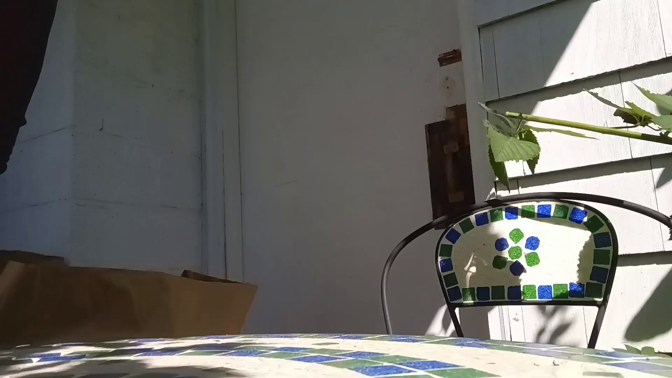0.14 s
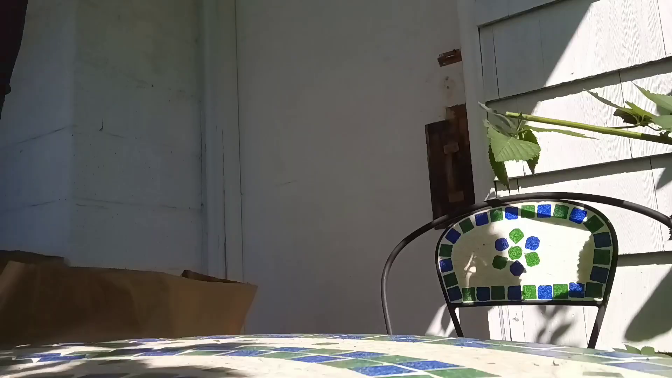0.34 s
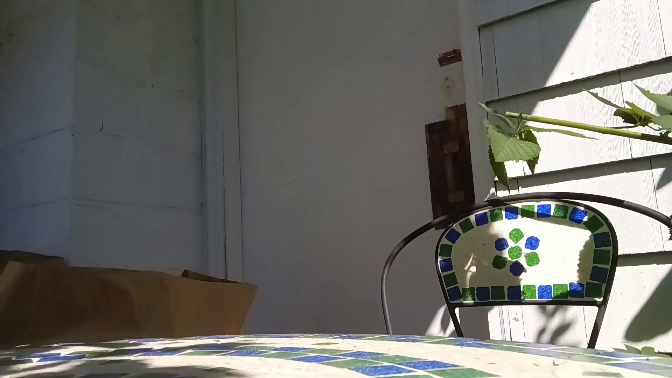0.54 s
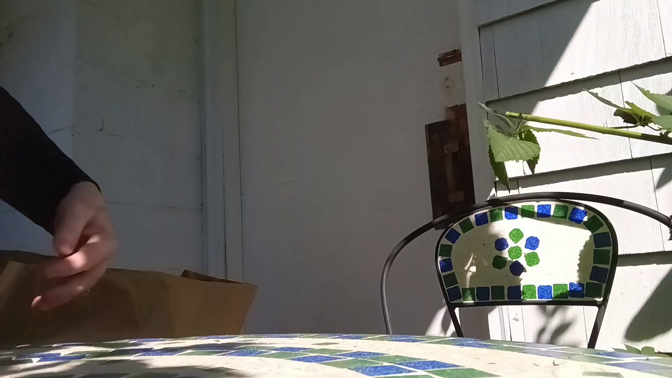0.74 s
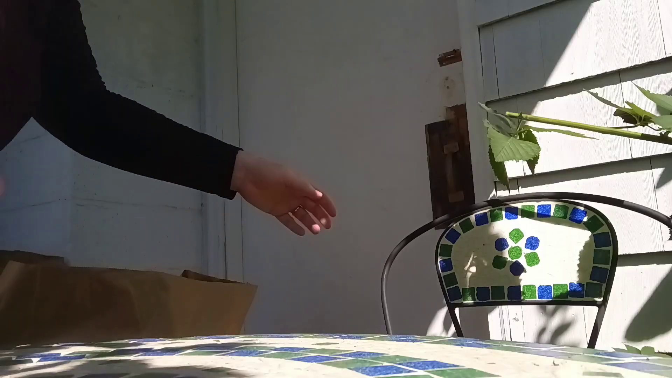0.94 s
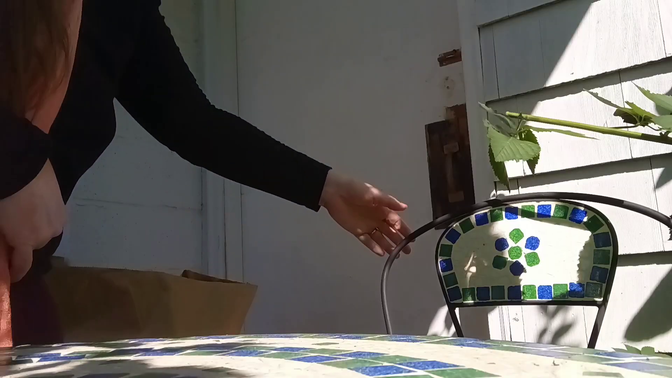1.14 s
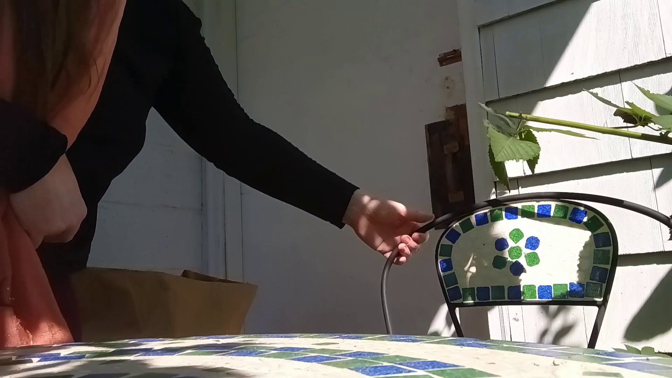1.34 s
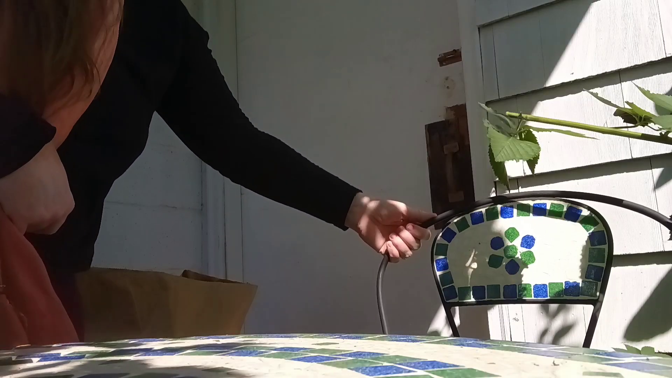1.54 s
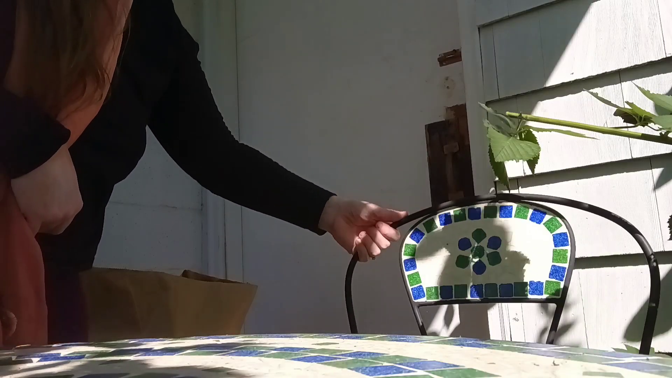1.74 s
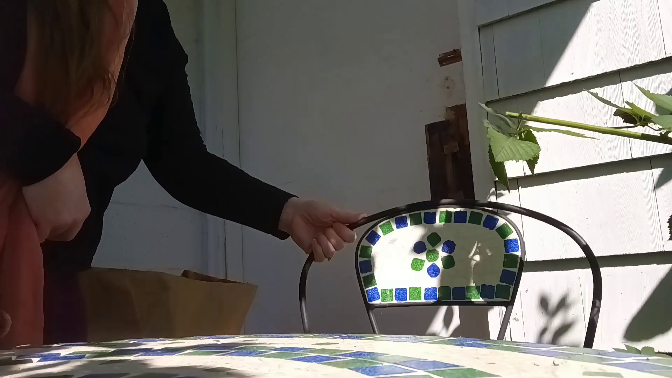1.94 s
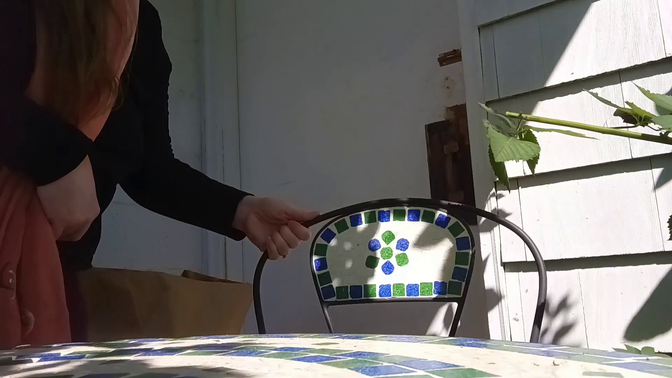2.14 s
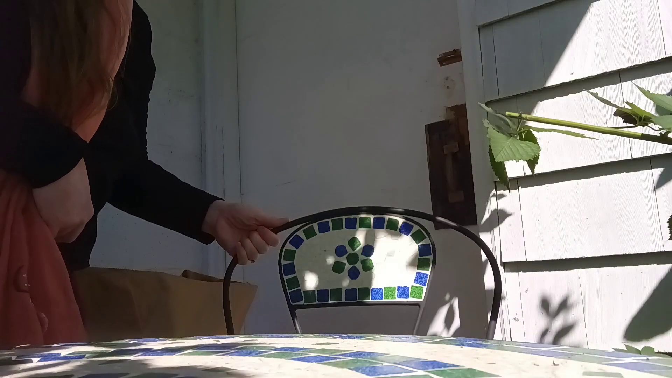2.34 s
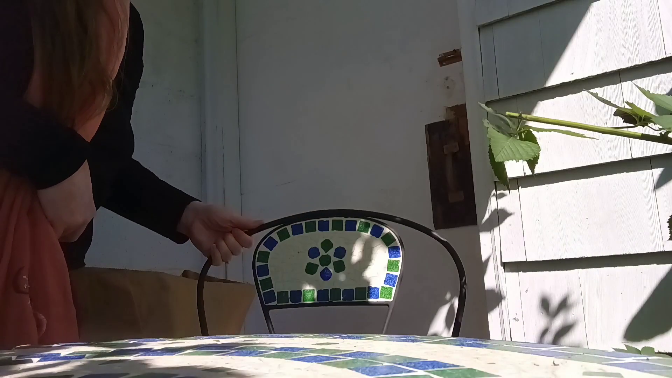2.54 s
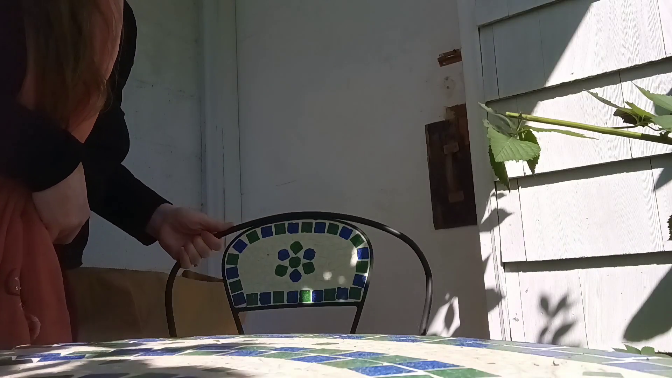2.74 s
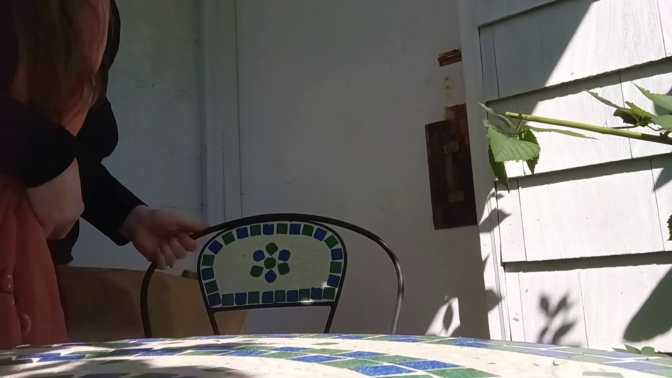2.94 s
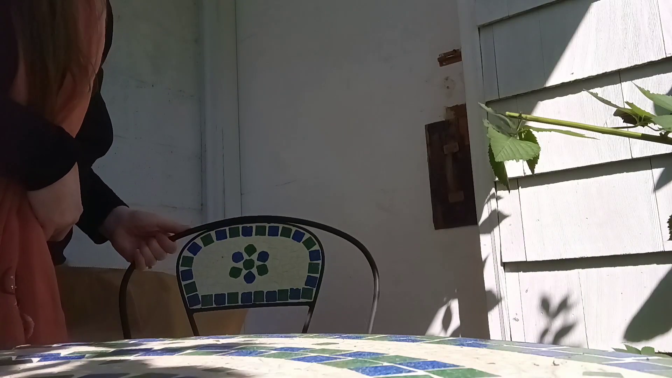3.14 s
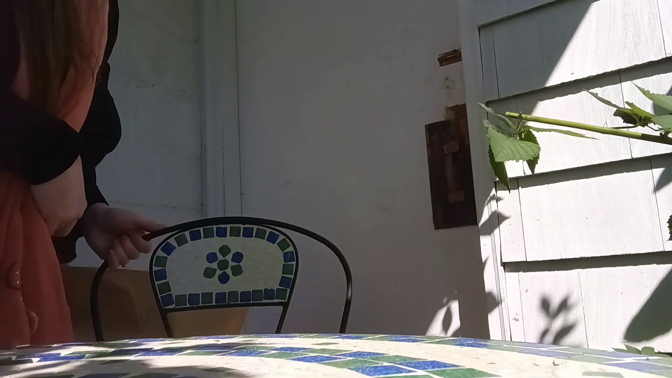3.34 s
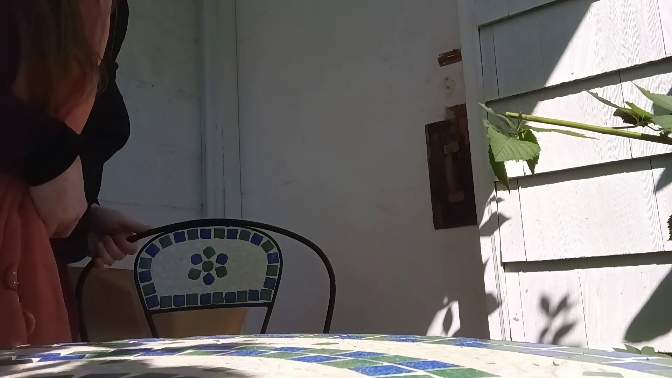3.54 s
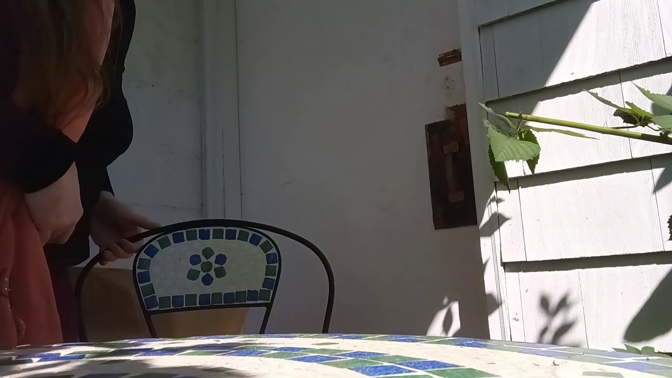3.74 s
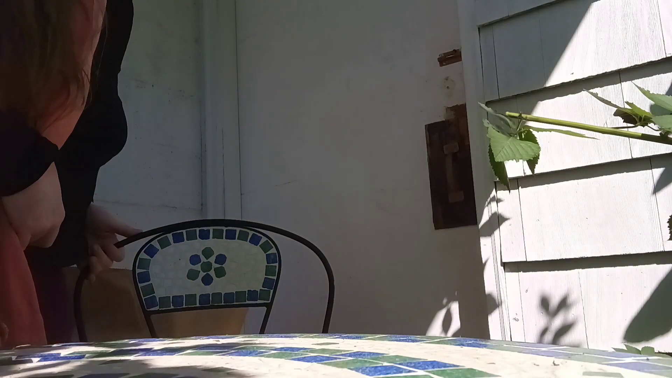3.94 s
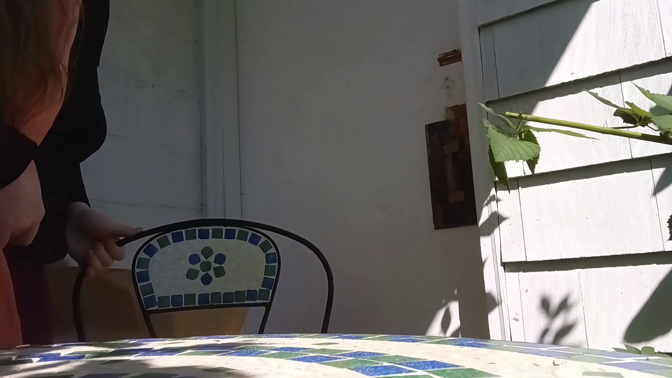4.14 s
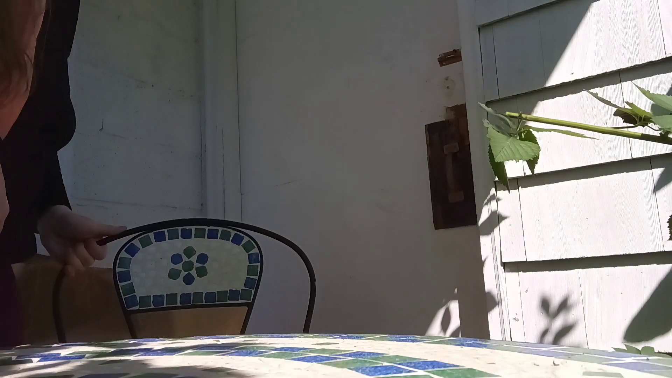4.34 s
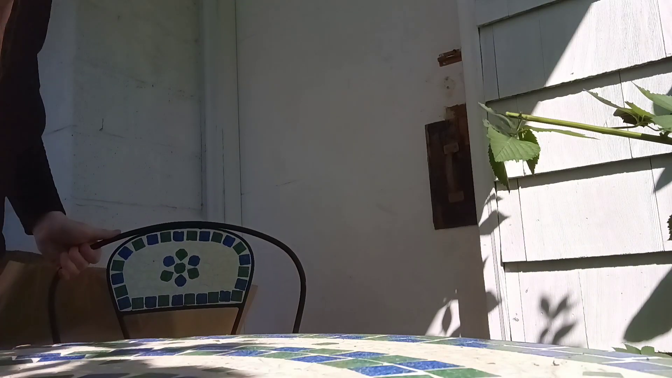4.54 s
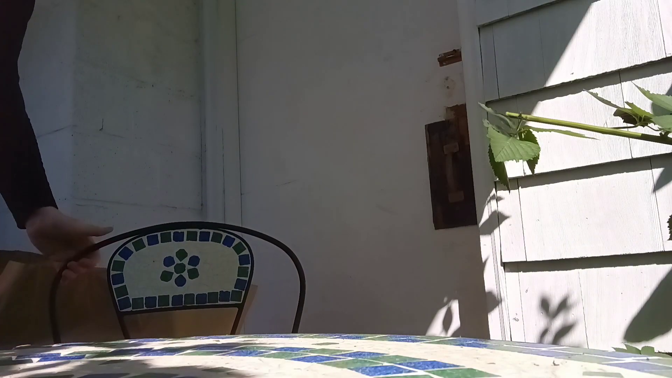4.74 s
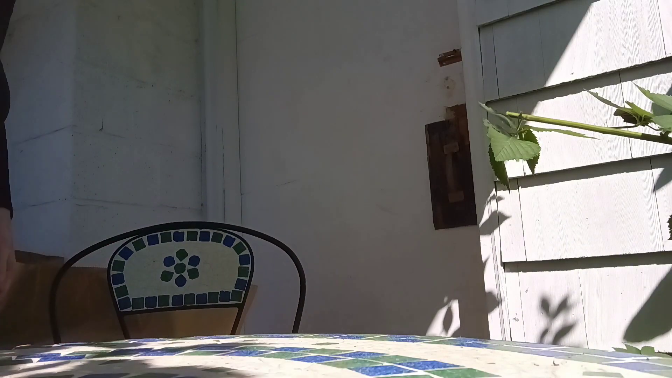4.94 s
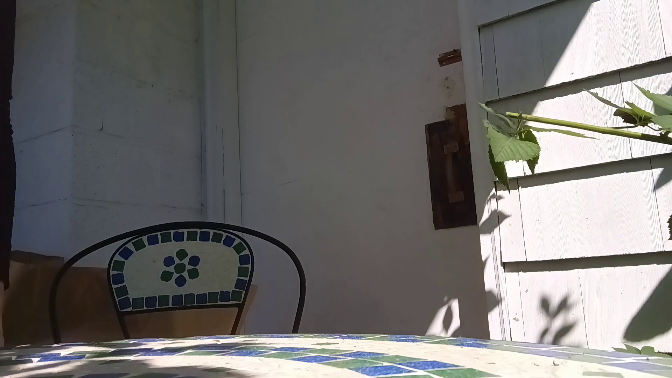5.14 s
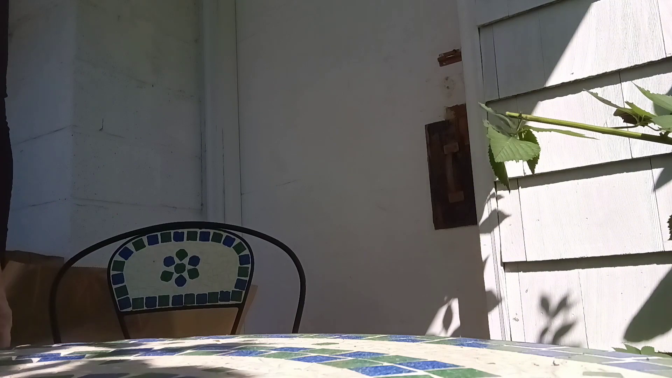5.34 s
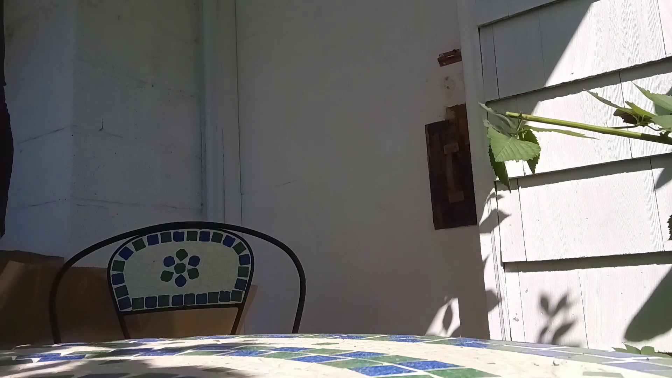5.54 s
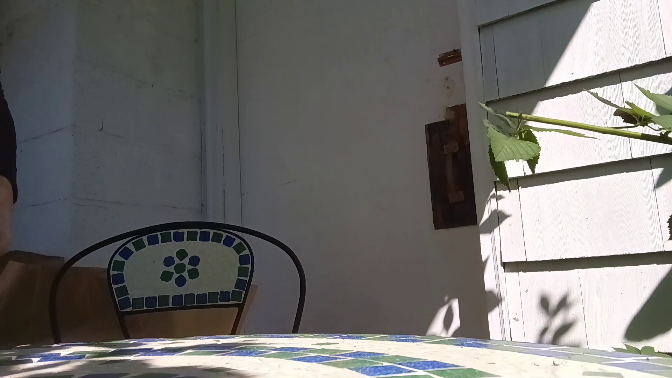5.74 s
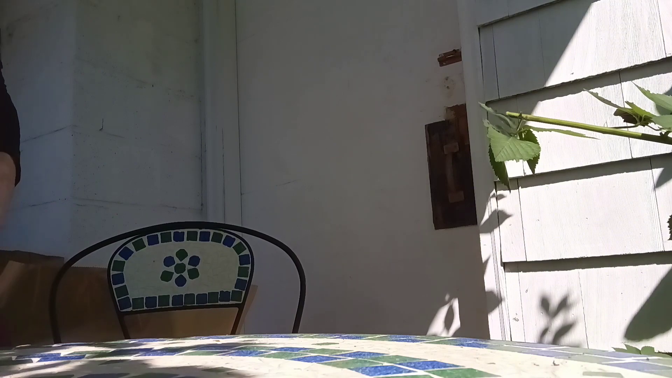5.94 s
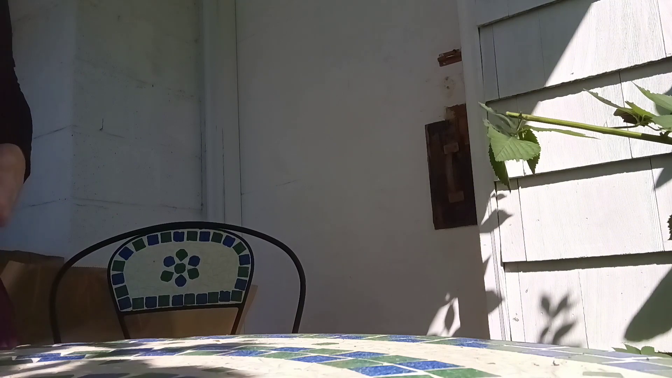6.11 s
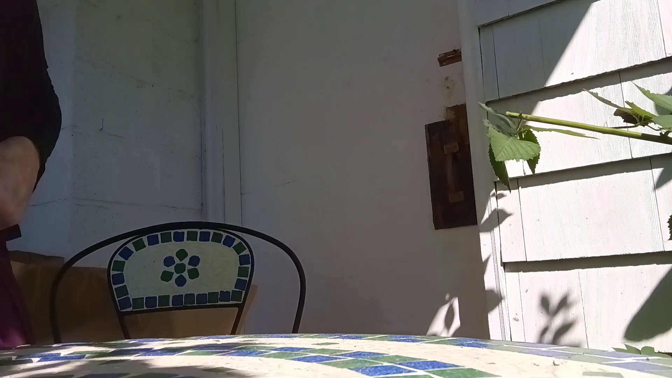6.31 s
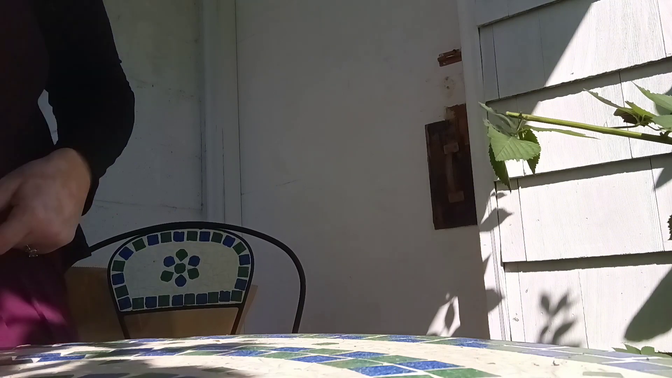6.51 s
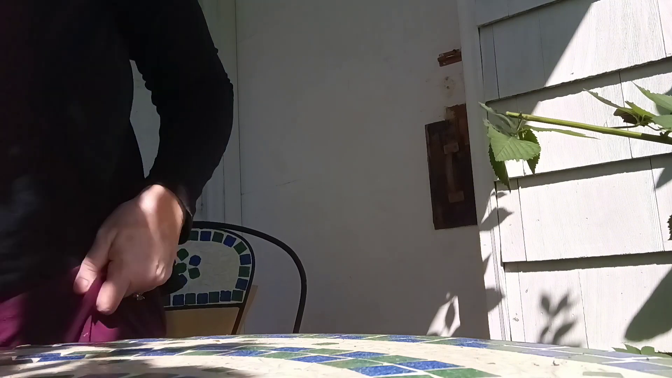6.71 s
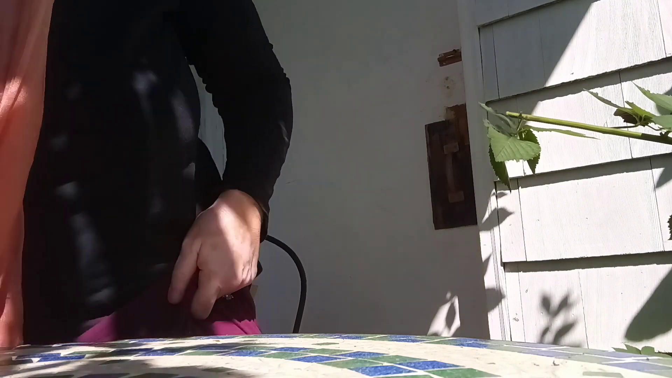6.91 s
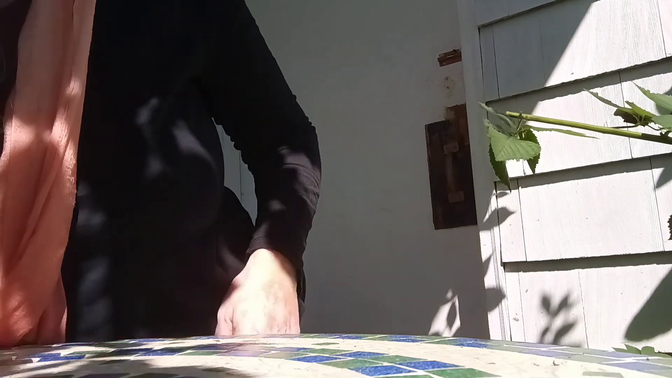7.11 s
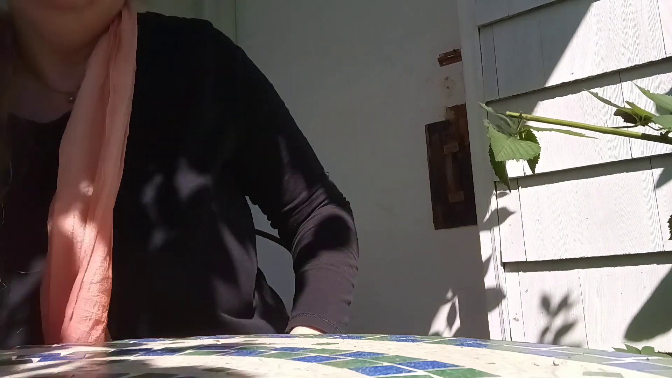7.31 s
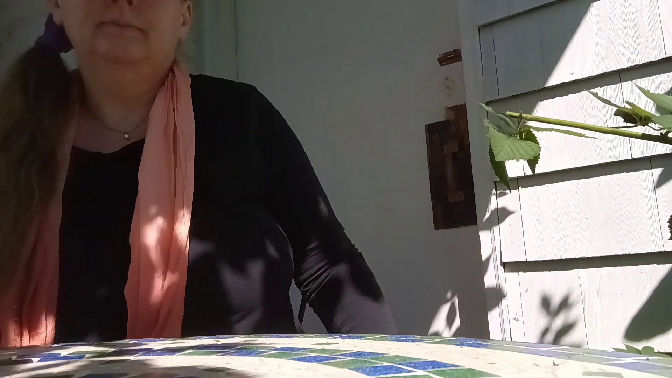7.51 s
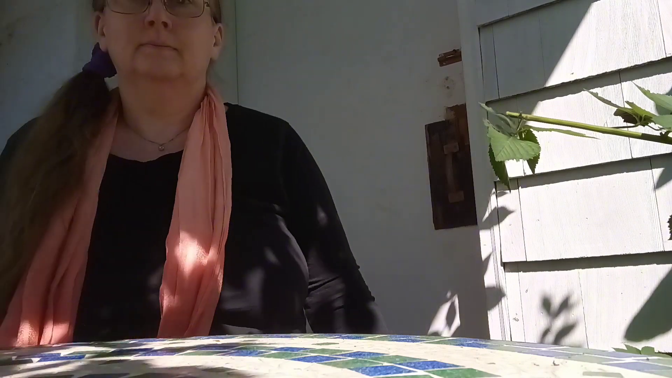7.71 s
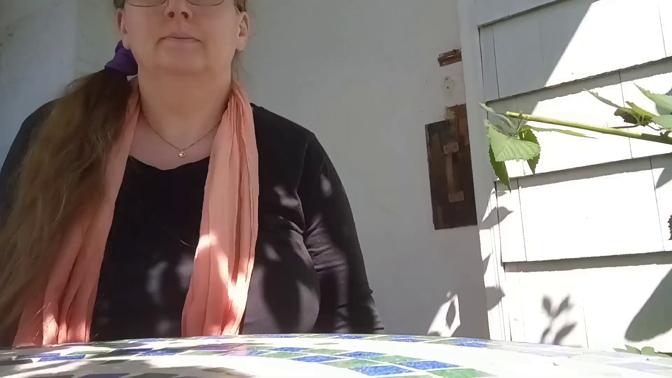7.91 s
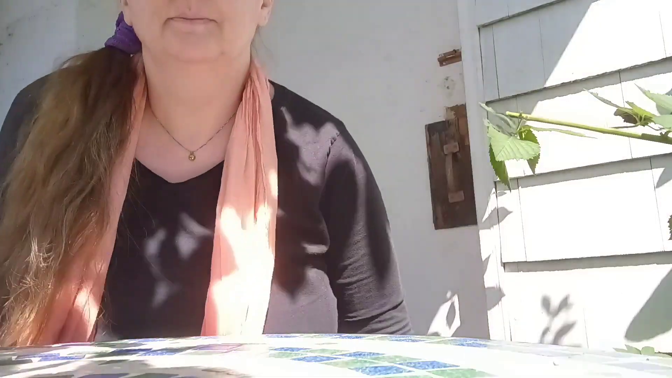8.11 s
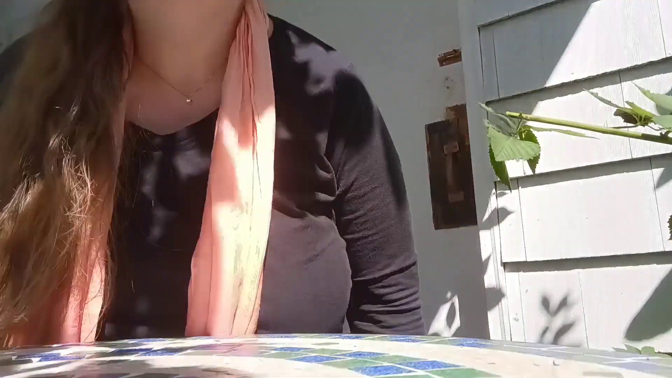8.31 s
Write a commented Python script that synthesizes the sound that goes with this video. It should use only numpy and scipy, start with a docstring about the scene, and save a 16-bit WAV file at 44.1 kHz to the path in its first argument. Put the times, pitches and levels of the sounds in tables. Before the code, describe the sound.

The first quarter second fades in from silence to a soft outdoor bed: low rumble, insect hiss, high pulsing crickets and a distant engine droning low and wavering. Faint scuffs come at 0.5 to 1.3 s, a stronger one at 1.6. From about 1.6 to 3.7 s a metal chair is dragged across hard floor: sharp knocks and gritty bites first, then rough stuttering scrape, ringing frame, leg judder and thin high squeaks near 2.9 and 3.4. After a half-second pause, a second harsh scrape runs 4.2 to 4.8 with knocks and dull thuds. Quiet follows, with a soft step around 5.0, a hum swell and light scuffs. Clothing and shoe rustles grow from 6.7 to 7.1. At 7.37 a hard hollow clunk rings briefly as someone sits, followed by a scuff and low floor boom at 7.5. A deeper engine drone joins, sagging in pitch; a small knock ends at 8.3.

```python
"""A wrought-metal patio chair is dragged twice over a hard porch floor, then someone sits down in it.
Stick-slip friction, as random clicks, excites its legs, damped frame modes and grit; feet squeak.
Shoes and clothes scuff as swells of fine grains, footfalls thud, and the floor booms under the sitter.
Crickets sing as pulsed sines, a distant engine drones as a wavering tone with its octave,
and filtered noise gives the garden's rumble and hiss. Dense decaying echoes surround the near sounds."""
import sys
import numpy as np
from scipy import signal
from scipy.fft import rfft, irfft
from scipy.io import wavfile
from scipy.ndimage import uniform_filter1d

SR = 44100
rng = np.random.default_rng(int(sys.argv[2]) if len(sys.argv) > 2 else 0)


def output_pcm(signal):
    """Save a mono or channel-first signal as 16-bit PCM at the path in sys.argv[1].

    Samples are clipped to [-1, 1] before scaling.
    """
    pcm = np.clip(np.atleast_2d(signal).T, -1, 1) * 32767
    wavfile.write(sys.argv[1], SR, np.round(pcm).astype(np.int16))


N = 368763
T = np.arange(N) / SR  # time [s]
HZ = np.fft.rfftfreq(8192, 1 / SR)  # frequency grid for filter design [Hz]

# spectral shapes of the chair's judder, ring and grit, one list each: (frequency [Hz], density [dB per Hz])
VOICE_SPECTRA = [
    [(30, -27.5), (60, -19), (110, -17.5), (160, -26), (205, -4.5), (238, -15.5), (270, 1.5), (305, -0.5),
     (337, 7), (400, -4.5), (480, -8.5), (700, -78)],
    [(350, -37), (520, -5.5), (640, 2.5), (800, -7), (980, 6), (1100, -4), (1260, -1), (1500, -8),
     (2000, -7.5), (2700, -14.5), (4000, -61)],
    [(1800, -19), (2900, -12), (3400, -11.5), (3780, -2.5), (4300, -8), (5100, 2.5), (6000, -1), (7200, 0),
     (8300, -6), (9100, -8.5), (10500, -16.5), (13800, -11.5), (15500, -50)],
]


def amp(db):
    """Converts level to amplitude gain: 20 dB is a factor of ten."""
    return 10 ** (np.asarray(db) / 20)


def evened(x):
    """Normalizes mean power, scaling to rms 1."""
    return x / np.sqrt(np.mean(x ** 2) + 1e-20)


def read(points, hz):
    """Interpolates a table on a logarithmic frequency axis."""
    f, value = np.transpose(points)
    return np.interp(np.log(hz + 1), np.log(f + 1), value)


def drift(hz):
    """Band-limited random fluctuation of rms 1, up to about the given rate."""
    place = T * 2 * hz
    knots = rng.standard_normal(8192)
    return evened(np.interp(place, np.arange(len(knots)), knots))


def colour(x, db):
    """Minimum-phase filtering: a causal response of energy 1 with the given dB shape over HZ."""
    log_gain = np.log(amp(np.r_[db, db[-2:0:-1]]))
    # the Hilbert transform of the log gain gives the minimum phase
    spectrum = np.exp(np.conj(signal.hilbert(log_gain)))
    taps = np.fft.ifft(spectrum).real[:len(HZ)]
    return signal.oaconvolve(x, taps / np.linalg.norm(taps))[:N]


def slips(per_s, spread_db):
    """Stick-slip as a random impulse train: clicks of uneven size and sign, rms 1."""
    size = amp(spread_db * np.minimum(rng.exponential(1, N), 3.5))
    sign = rng.choice([-1, 1], N)
    happens = rng.random(N) < per_s / SR
    return evened(size * sign * happens)


def blows(times, levels_db, chatter_s=0.0045):
    """Impact as decaying noise: each burst holds the energy of 20 ms at its level."""
    out, t = np.zeros(N), T[:1500]
    for s, db in zip(times, levels_db):
        burst = rng.standard_normal(len(t)) * np.sqrt(t) * np.exp(-t / chatter_s)
        burst *= amp(db) * np.sqrt(.02 * SR) / np.linalg.norm(burst)
        part = out[round(s * SR):][:len(t)]
        part += burst[:len(part)]
    return out


def pair(a, b):
    """Diffuse-field coherence: two microphones are alike in the bass and nearly unrelated in the treble."""
    # (frequency [Hz], left-right likeness [0 to 1])
    likeness = [(60, 0.41), (400, 0.9), (950, 0.12), (1400, 0.033), (3000, 0.017)]
    same = np.clip(read(likeness, np.fft.rfftfreq(len(a), 1 / SR)), 0, 1)
    right = same * rfft(a) + np.sqrt(1 - same ** 2) * rfft(b)
    return np.array([a, irfft(right, len(a))])


def porch(x, direct=0.29, wet=0.92):
    """Reverberation: direct sound plus dense echoes decaying at a rate set by frequency, later on the left."""
    # (frequency [Hz], 60 dB decay time [s])
    decay = [(80, 0.47), (300, 0.36), (1000, 0.34), (5000, 0.2), (14000, 0.063)]
    hz, t, z = signal.stft(rng.standard_normal((2, SR // 2)), SR, nperseg=256)
    fading = amp(-60 * t / read(decay, hz)[:, None])
    tail = signal.istft(z * fading, SR, nperseg=256)[1]
    t = T[:tail.shape[1]]
    # soft onset, and a window that closes the tail
    tail = pair(*tail) * (1 - np.exp(-t / 0.0002)) * np.cos(np.pi / 2 * t / t[-1]) ** 2
    tail *= wet / np.linalg.norm(tail[0])
    tail[:, 0] += direct
    tail[0] = np.roll(tail[0], 45)  # delay [samples]
    return signal.oaconvolve(x[None], tail, axes=1)[:, :N]


def ring(drive, hz, t60, swing=0):
    """Damped resonance: one mode of energy 1 at both microphones; swing [rad] shifts its phase on the right."""
    r = np.exp(-np.log(1000) / (t60 * SR))  # pole radius
    pole = r * np.exp(2j * np.pi * hz / SR)
    z = signal.lfilter([np.sqrt(2 * (1 - r ** 2))], [1, -pole], drive + 1e-15)
    lead = 2 * np.pi * hz * 45 / SR + swing  # phase of the 45-sample lead on the right
    return np.array([z.real, (z * np.exp(1j * lead)).real])


def garden(level_db=-49.5):
    """Superposed far sources act as shaped noise: low outdoor rumble and the blended hiss of far insects."""
    # (frequency [Hz], density [dB per Hz])
    air_spectrum = [(25, -12), (50, -1), (95, 15.5), (160, 7), (260, -1.5), (520, -5.5), (800, -2),
                    (1400, -7.5), (3500, -11.5), (4600, -6.5), (5500, 1), (7100, -2.5), (9000, -14),
                    (12000, -26.5)]
    air = pair(*(colour(rng.standard_normal(N), read(air_spectrum, HZ)) for _ in range(2)))
    return amp(level_db + 0.067 * drift(3)) * air


def crickets(trill_hz=6900, trill_db=-55, strokes_per_s=15.0, sweep_hz=70):
    """Amplitude-modulated tones: one cricket trills without pause, others chirp; a thin high whine on top."""
    # (first chirp [s], silent from [s], chirp every [s], chirp length [s],
    #  frequency [Hz], level [dB], wing strokes [1/s])
    chirpers = [(.135, 1.6, .425, .115, 4590, -46, 26), (.22, 7.5, 2.3, .16, 5170, -49, 40),
                (.38, 8, 1.85, .15, 5660, -48.5, 44), (1.08, 6.6, .655, .15, 5370, -50, 45),
                (5.55, 8.1, .335, .13, 6130, -48, 45)]
    chirp_rise_hz, chirp_spread_db = 40, 1.5
    whine_hz, whine_db = 14220, -71.5
    strokes = np.cumsum(strokes_per_s + 0.32 * drift(3.6)) / SR % 1  # place within each wing stroke
    waver = 55 * drift(220)  # pitch waver [Hz]
    pitch = trill_hz + sweep_hz * (2 * strokes - 1) + waver
    trill_level = amp(trill_db + 2 * drift(1.063))
    song = trill_level * np.sin(np.pi * strokes) ** 2 * np.sin(2 * np.pi * np.cumsum(pitch) / SR)
    song += amp(whine_db) * np.sin(2 * np.pi * np.cumsum(whine_hz + waver) / SR)
    # no two chirps are equally strong
    strength = amp(chirp_spread_db * drift(6.3))
    for first, until, every, length, hz, db, per_s in chirpers:
        for s in np.arange(first, until, every):
            on = (T >= s) & (T < s + length)
            wings = np.sin(np.pi * per_s * (T[on] - s)) ** 4 * signal.windows.tukey(on.sum(), .3)
            pitch = hz + chirp_rise_hz * np.linspace(-.5, .5, on.sum()) + waver[on]
            tone = np.sin(2 * np.pi * np.cumsum(pitch) / SR)
            song[on] += amp(db) * strength[on] * wings * tone
    return porch(np.sqrt(2) * song, direct=1.0, wet=.6)


def exhaust(hz, db, throb_db=1.0, waver_hz=3.88, octave_db=-20):
    """Periodic firing gives a harmonic tone: a far note and its octave, throbbing and wavering."""
    turn = 2 * np.pi * np.cumsum(hz + waver_hz * drift(14.66)) / SR
    level = uniform_filter1d(amp(db + throb_db * drift(8.3)), size=1000)
    return level * np.sqrt(2) * (np.sin(turn) + amp(octave_db) * np.sin(2 * turn))


def engine():
    """Pitch follows firing rate: a far engine drones, joined late by a deeper drone that sags to its idle."""
    # (time [s], firing rate [Hz], level [dB])
    hum = [(.1, 124.8, -66), (.34, 119.8, -39), (.5, 123, -58), (1.6, 123.3, -51.5), (4.1, 114, -58.5),
           (4.95, 113, -42.5), (5.4, 112.9, -53), (6.35, 114, -52.5), (8.36, 118.5, -55)]
    drone_from_s, drone_until_s, drone_fade_s, drone_db = 7.1, 8.36, 0.18, -46.5
    drone_hz, drone_sag_hz, drone_settle_s = 79.3, 42, 0.2
    s, hz, db = np.transpose(hum)
    age = np.maximum(T - drone_from_s, 0)
    fade = np.clip(np.minimum(age, drone_until_s - T) / drone_fade_s, 0, 1)
    drone_pitch = drone_hz + drone_sag_hz * np.exp(-age / drone_settle_s)
    drone = fade * exhaust(drone_pitch, drone_db)
    return exhaust(np.interp(T, s, hz), np.interp(T, s, db)) + drone


def scuffs():
    """Granular friction: shoes and clothes give brief swells of fine grains."""
    # (time of peak [s], rise [s], fall [s], level [dB], tilt above 500 Hz [dB per octave])
    strokes = [(.53, .03, .06, -44, 0), (.961, 0.0029, 0.016, -44, -9), (0.987, 0.0089, 0.0067, -38.5, 3),
               (1.301, 0.013, 0.0048, -35, -3), (1.593, 0.0075, 0.019, -28, -3),
               (3.984, 0.017, 0.018, -46.5, -3), (5.242, 0.018, 0.014, -37, 0),
               (6.13, 0.022, 0.035, -45.5, 12), (6.702, 0.035, 0.012, -39.5, 2.5),
               (6.723, 0.0023, 0.022, -31, -1), (6.891, 0.0064, 0.0059, -33, -2.5),
               (7.043, 0.006, 0.015, -31.5, 5), (7.095, 0.012, 0.01, -26.5, 6.5),
               (7.466, 0.043, 0.016, -30.5, 0), (7.517, 0.0069, 0.0021, -20.5, 2.5),
               (8.16, 0.047, .03, -54, -9), (8.276, 0.0081, 0.016, -38, 1)]
    # (frequency [Hz], density before the tilt [dB per Hz])
    scuff_spectrum = [(200, -17), (900, -22.5), (1500, -12), (3200, -1.5), (4300, 0), (5400, 9), (7200, 3),
                      (9000, -3), (11000, -15), (15000, -43)]
    grains, out = slips(4000, 4.5), np.zeros(N)
    octaves = np.log2(np.maximum(HZ, 500) / 500)
    for s, rise, fall, db, tilt_db in strokes:
        stroke = np.exp(np.maximum(np.minimum((T - s) / rise, (s - T) / fall), -20))
        out += colour(amp(db) * stroke * grains, read(scuff_spectrum, HZ) + tilt_db * octaves)
    return porch(out, direct=0.75, wet=0.99)


def squeaks(waver_hz=170):
    """Self-sustained friction oscillation: short unsteady whistles of a foot sliding on stone."""
    # (start [s], length [s], frequency [Hz], level [dB])
    whistles = [(1.573, 0.017, 3340, -39), (2.753, 0.58, 5020, -32), (2.926, 0.03, 7820, -16),
                (3.27, 0.035, 5060, -26.5), (3.41, 0.03, 7760, -23), (3.466, 0.052, 7800, -24),
                (7.748, 0.016, 2800, -44)]
    waver, out = waver_hz * drift(312.9), np.zeros(N)
    for s, length, hz, db in whistles:
        swell = np.sin(np.pi * np.clip((T - s) / length, 0, 1)) ** 2
        out += amp(db) * swell * np.sin(2 * np.pi * np.cumsum(hz + waver) / SR)
    return porch(np.sqrt(2) * out)


def during(curves):
    """Piecewise-linear level in dB along the pulls, silence between them."""
    levels = [np.interp(T, *np.transpose(rows), left=-200, right=-200) for rows in curves]
    return np.max(levels, axis=0)


def pulling():
    """Sliding friction: force of judder, ring and grit, the ring and grit following the effort."""
    # how hard the chair slides, one list a pull: (time [s], effort [dB])
    effort = [
        [(1.74, -22.5), (1.936, -25.5), (1.968, -34.5), (2.026, -32.5), (2.244, -18.5), (2.66, -27.5),
         (2.768, -32), (2.78, -26)],
        [(2.78, -35), (2.796, -32.5), (3.05, -30), (3.08, -34.5), (3.092, -25), (3.122, -31), (3.206, -31),
         (3.275, -59)],
        [(3.275, -47), (3.285, -29.5), (3.335, -28.5), (3.537, -29.5), (3.619, -54), (3.649, -37.5),
         (3.683, -57), (3.7, -29)],
        [(4.21, -48), (4.236, -37.5), (4.274, -37), (4.3, -28.5), (4.566, -22.5), (4.578, -33.5), (4.75, -34.5),
         (4.79, -51.5)],
    ]
    # how much its legs judder, one list a pull: (time [s], level [dB])
    judder = [
        [(1.74, -24), (1.854, -39), (2.008, -39.5), (2.102, -28), (2.78, -39)],
        [(2.78, -43), (2.852, -30), (3.188, -25.5), (3.254, -30), (3.275, -39)],
        [(3.275, -37), (3.379, -29.5), (3.429, -21.5), (3.529, -25), (3.58, -36)],
        [(4.29, -32), (4.328, -24.5), (4.378, -39), (4.484, -19), (4.75, -31)],
    ]
    # grit grows faster than the effort, and thins out when juddering legs hop off the floor
    grit_knee_db, grit_growth, hop_loss = -30.5, 1.2, 0.3
    start_stop_s = 0.039  # the chair takes a moment to start and stop
    effort_db, judder_db = during(effort), during(judder)
    hop_db = np.maximum(judder_db - effort_db, 0)
    grit_db = grit_knee_db + grit_growth * (effort_db - grit_knee_db) - hop_loss * hop_db
    return uniform_filter1d(amp([judder_db, effort_db, grit_db]), size=max(round(start_stop_s * SR), 1))


def bites():
    """Transient contact force: a quick attack, a hold and a short release as a foot bites into the stone."""
    # (start [s], length [s], grit level [dB])
    bite_rows = [(1.695, 0.013, -13.5), (1.78, .016, -13), (1.927, 0.049, -22), (2.036, 0.026, -25),
                 (2.276, 0.043, -16.5), (2.428, 0.074, -16.5), (2.886, 0.021, -20), (3.273, 0.0079, -31),
                 (3.454, 0.045, -22), (4.337, 0.049, -15.5), (4.499, 0.017, -21)]
    attack_s, release_s = 0.00067, 0.011
    force = np.zeros(N)
    for s, length, db in bite_rows:
        attack = np.clip((T - s) / attack_s, 0, 1)
        release = np.exp(-np.clip((T - s - length) / release_s, 0, 20))
        force += amp(db) * attack * release
    return force


def frame(drives):
    """Modal synthesis: each mode takes its own register's drive, varying as load shifts between the feet."""
    # (frequency [Hz], level against its drive before the frame's overall gain [dB], 60 dB decay time [s])
    frame_modes = [(272, -17, .12), (335, -14, .14), (613, -13, .18), (633, -16, .4), (727, -10, .2),
                   (805, -17, .18), (863, -14, .2), (906, -9, .2), (1005, -7, .17), (1040, -14, .15),
                   (1167, -11, .14), (1239, -10, .16), (1378, -11, .2), (1421, -17, .18), (1981, -19, .18),
                   (2588, -19, .14), (813, -35, 3), (866.7, -34, 3), (942, -32, 2), (963.6, -32, 2.5),
                   (1001, -31, 2), (3770, -18, .08), (4970, -14, .09), (5170, -15, .06), (5458, -17, .08),
                   (6940, -12, .14), (7190, -18, .1), (8480, -22, .1), (9574, -18, .1), (11200, -27, .05)]
    out = np.zeros((2, N))
    for hz, db, t60 in frame_modes:
        drive = drives[np.searchsorted([480, 2800], hz)]  # register borders [Hz]
        coupling = evened(amp(3.5 * drift(4)))
        swing = min(hz / 1600, 2) ** 2 * drift(1)
        out += amp(db) * ring(drive * coupling, hz, t60, swing)
    return out


def shifting(x):
    """Varying modal coupling: contact points wander, so narrow resonances swell and fade in turn."""
    z = signal.stft(x, SR, nperseg=512)[2]
    patches = uniform_filter1d(rng.standard_normal(z.shape), size=2, axis=0)  # across frequency
    patches = uniform_filter1d(patches, size=24, axis=1)  # along time
    gain = evened(amp(5.5 * np.clip(evened(patches), -2, 1.7)))
    return signal.istft(z * gain, SR, nperseg=512)[1][:N]


def moving_porch(x, turns_per_s=1.698):
    """Interference changes with source position: three echo patterns crossfade as the chair travels."""
    out = np.zeros((2, N))
    for k in range(3):
        # the squares of the three weights always add up to 1
        weight = np.sqrt(2 / 3) * np.cos(np.pi * (turns_per_s * T + k / 3))
        out += porch(x * weight)
    return out


def chair(flutter_db=3.0, frame_db=.5):
    """Stick-slip excitation: slips, knocks and bites drive legs, frame and grit under fluttering pressure."""
    # a foot catches and the leg knocks: (time [s], judder level [dB], ring level [dB])
    knocks = [(1.606, -29.5, -40.5), (1.643, -27, -37.5), (1.7, -18.5, -22), (1.781, -20.5, -34),
              (1.828, -17.5, -29), (2.111, -29, -36), (3.134, -18, -48), (3.216, -21, -45),
              (3.245, -35, -48), (3.43, -17.5, -30), (3.611, -18, -37), (3.63, -27, -32), (4.256, -26, -61),
              (4.498, -21, -25), (4.566, -23, -31), (4.634, -27, -30.5), (4.743, -27, -43),
              (4.846, -37.5, -47), (6.174, -40, -52.5)]
    # judder, ring and grit in turn: (slips [1/s], spread of their size [dB], drive [dB],
    #  level of the dull unpitched body [dB])
    slip_rows = [(328.3, 4.5, -1, -0.5), (727.4, 3.5, -2, -3), (1755, 7.5, -2, -1)]
    bite_ring_db = -11.5  # a bite also rings the frame, this much more weakly
    s, judder_db, ring_db = np.transpose(knocks)
    biting = bites() * slips(per_s=4000, spread_db=4)
    ring_accent = blows(s, ring_db) + amp(bite_ring_db) * biting
    accents = [blows(s, judder_db), ring_accent, biting]
    pressure = amp(flutter_db * drift(30))  # foot pressure, common to all three voices
    drives, body = [], []
    for force, accent, voice, row in zip(pulling(), accents, VOICE_SPECTRA, slip_rows):
        per_s, spread_db, drive_db, body_db = row
        drive = amp(drive_db) * force * pressure * slips(per_s, spread_db) + accent
        drives.append(drive)
        body.append(amp(body_db) * colour(drive, read(voice, HZ)))
    judder, clang, grit = body
    return moving_porch(judder + shifting(clang + grit)) + amp(frame_db) * frame(drives)


def steps():
    """Impulse response of the floor: each thud of shoe or chair foot is answered by a dull boom."""
    # (time [s], level [dB])
    footfalls = [(3.0, -38), (3.14, -41), (3.44, -30.5), (3.565, -32.5), (3.714, -44), (4.301, -33),
                 (4.637, -29.5), (4.695, -27.5), (4.755, -45), (4.83, -43), (5.03, -37), (5.211, -48),
                 (6.17, -50), (8.128, -47.5)]
    # (frequency [Hz], density [dB per Hz])
    floor_spectrum = [(20, -40), (40, -20), (70, -5), (125, 0), (165, -2), (225, -1), (290, -12),
                      (450, -24), (1000, -42), (3000, -65)]
    thuds = blows(*np.transpose(footfalls), chatter_s=.009)
    return porch(colour(thuds, read(floor_spectrum, HZ)), direct=0.66, wet=0.92)


def seat(modes_db=-2.0):
    """Impact on damped modes: the loaded chair knocks on the floor and rings briefly under the sitter."""
    # weight lands on the seat: (time [s], thump level [dB], clack level [dB])
    landings = [(7.37, -30.5, -28), (7.375, -19, -23), (7.38, -21, -20), (7.407, -26, -30),
                (7.436, -50, -40), (8.329, -34.5, -42), (8.342, -28.5, -30)]
    # (frequency [Hz], density [dB per Hz])
    thump_spectrum = [(20, -57), (40, -8), (100, -16), (160, 3.5), (230, -12), (340, 3), (480, -2),
                      (590, 0.5), (760, -2), (1000, -18), (1270, -12), (1600, -25), (2600, -18),
                      (5000, -80)]
    # modes under load: (frequency [Hz], level before modes_db is added [dB], 60 dB decay time [s])
    loaded_modes = [(167, -11, .2), (410, -13, .25), (606, -5, .18), (705, -19, .5), (764, -12, .22),
                    (872, -12, .18), (1245, -14, .15), (1405, -19, .14)]
    s, thump_db, clack_db = np.transpose(landings)
    push = blows(s, thump_db, chatter_s=0.00072)
    thump = colour(push, read(thump_spectrum, HZ))
    clack = colour(blows(s, clack_db), read(VOICE_SPECTRA[2], HZ))  # coloured like the grit
    metal = sum(amp(db) * ring(push, hz, t60) for hz, db, t60 in loaded_modes)
    knock = porch(thump, direct=0.088, wet=1.0)
    return knock + amp(modes_db) * metal + porch(clack, direct=0.81, wet=0.63)


def booms():
    """Low floor resonance: pure notes swell and die as the sitter's weight settles."""
    # (time of peak [s], width [s], frequency [Hz], level [dB])
    low_notes = [(7.47, 0.034, 171.7, -34.5), (7.56, 0.074, 109.7, -32.5)]
    out = np.zeros(N)
    for s, width, hz, db in low_notes:
        swell = np.exp(-np.minimum(((T - s) / width) ** 2, 20))
        out += amp(db) * swell * np.sin(2 * np.pi * hz * T)
    return np.sqrt(2) * out


def scene():
    """Linear superposition of all the sources."""
    near = scuffs() + squeaks() + chair() + steps() + seat() + booms()
    return garden() + crickets() + engine() + near


def record(dry):
    """Linear filtering: two microphone ports colour the sound differently, with a fade-in and a band limit."""
    # (frequency [Hz], left minus right [dB])
    balance = [(100, 7), (800, 5), (1400, 7), (1950, 1), (3000, 6), (4200, 2.5), (5100, -8.5), (6000, 1),
               (7100, 14.5), (8200, 3), (9300, -6), (14000, -12.5)]
    edge_hz = 15600
    lean_db = read(balance, np.fft.rfftfreq(N, 1 / SR))
    ports = amp(np.array([lean_db, -lean_db]) / 2)
    ports /= np.sqrt(np.mean(ports ** 2, 0))  # mean power gain of 1 at each frequency
    heard = irfft(rfft(dry) * ports, N)
    heard *= amp(np.interp(T, [0, .1, .17, .26], [-90, -36, -8, 0]))
    lowpass = signal.firwin(511, edge_hz, window=("kaiser", 9), fs=SR)
    return signal.oaconvolve(heard, lowpass[None], "same")


dry = scene()
out = record(dry)
output_pcm(out)
```